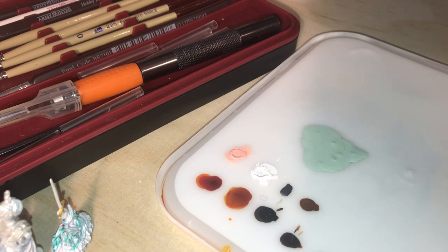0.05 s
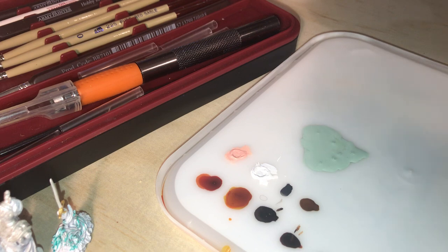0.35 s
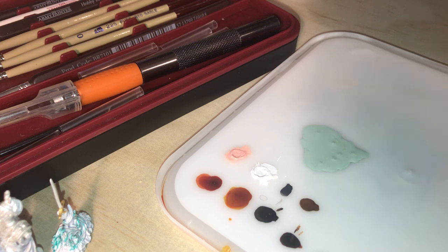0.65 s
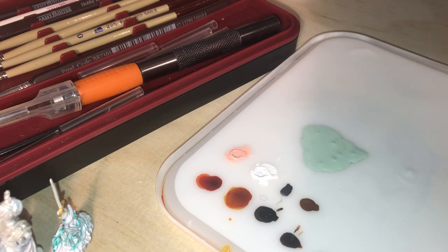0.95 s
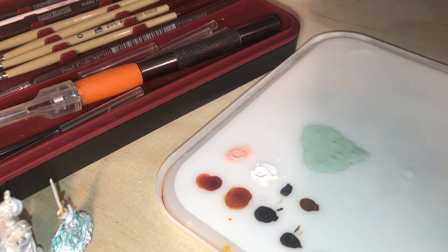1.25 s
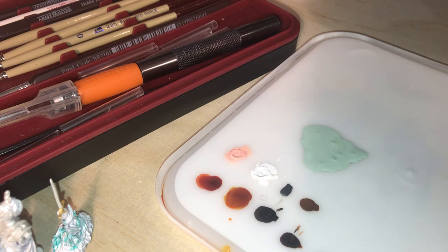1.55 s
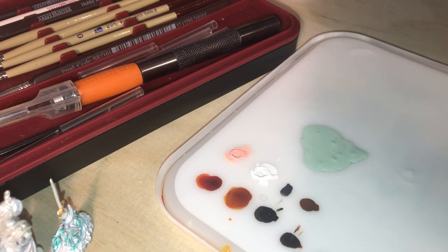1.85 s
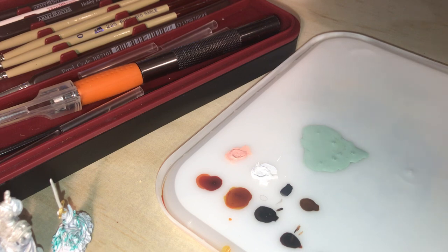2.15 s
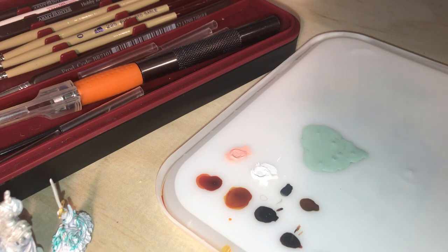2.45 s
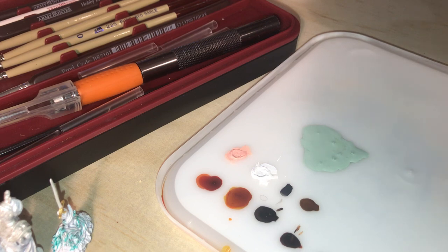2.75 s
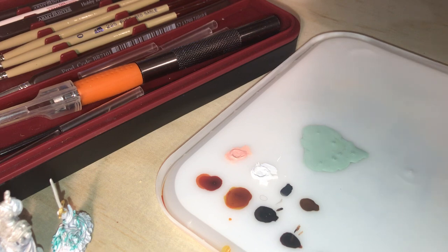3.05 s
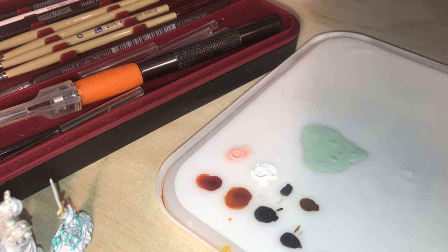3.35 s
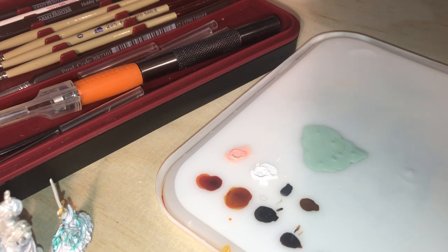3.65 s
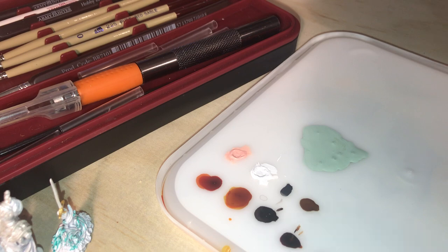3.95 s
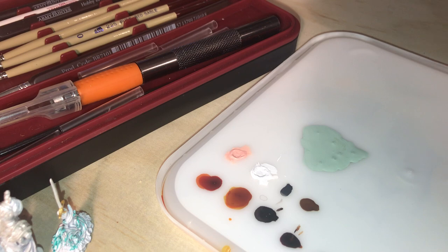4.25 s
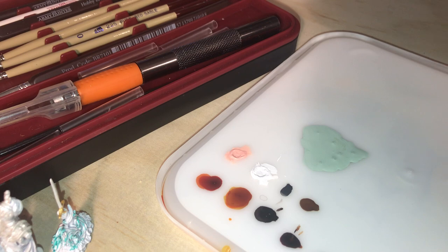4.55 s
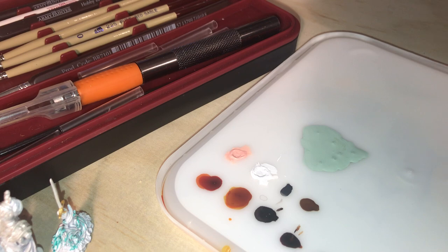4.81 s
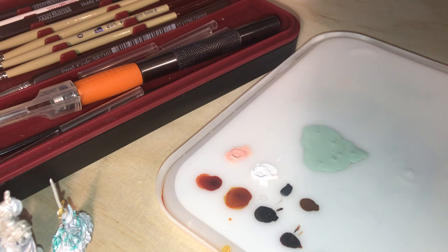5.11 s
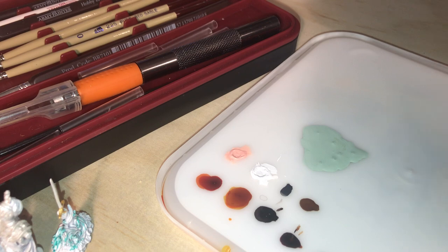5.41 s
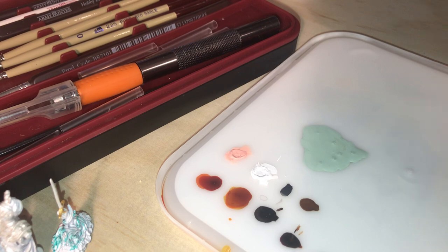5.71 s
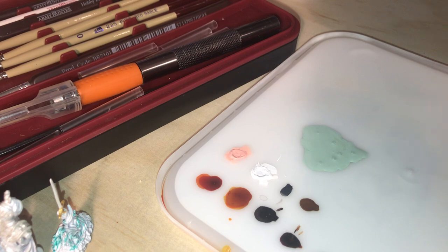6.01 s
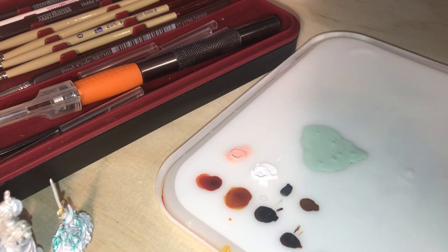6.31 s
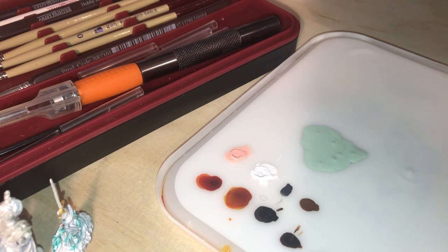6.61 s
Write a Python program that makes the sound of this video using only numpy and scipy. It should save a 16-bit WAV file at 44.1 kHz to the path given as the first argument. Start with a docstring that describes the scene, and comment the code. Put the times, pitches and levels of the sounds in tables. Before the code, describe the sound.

Close up in a quiet, small room, mixing balls rattle in a fast, steady rhythm inside a plastic paint bottle being shaken by hand. Bright clicks alternate with hollow knocks, and thick paint squelches and glugs softly underneath. The shaking hitches just after the start, pauses for a moment near four seconds, then carries on with some harder snaps. Faint room air lies behind it.

```python
"""Mixing balls rattle in a small plastic dropper bottle of paint, shaken about five times a second.
They snap against one end, land with a hollow clack at the other and tap the wall between.
Dragged paint sloshes, small bubbles squelch and air pockets glug; the hand thumps now and then.
A small room answers, over quiet air and a low rumble."""
import sys
import numpy as np
from scipy import signal
from scipy.fft import rfft, irfft
from scipy.io import wavfile

SR = 44100
rng = np.random.default_rng(int(sys.argv[2]) if len(sys.argv) > 2 else 0)


def wav_record(signal):
    """Record a signal, one row per channel, as 16-bit PCM in the file named by sys.argv[1]."""
    frames = np.transpose(np.atleast_2d(signal))
    bounded = np.clip(frames, -1, 1)
    # unit amplitude maps onto the largest positive 16-bit level
    quanta = np.round(bounded * 32767).astype(np.int16)
    wavfile.write(sys.argv[1], SR, quanta)


N = 294147
SIZE = 2048  # samples per short event
AGE_S = np.arange(SIZE) / SR
BINS_HZ = np.maximum(np.fft.rfftfreq(SIZE, 1 / SR), 1)


def clear_strikes():
    """Ball impacts as rows: t/s, click/dB, centre f/Hz, nominal ring/ms, tick/dB, knock/dB."""
    # hard snaps on bare plastic at one end: t/s, click level/dB, tick level/dB
    snaps = [(0.0493, -26, -24.5), (0.0555, -22, -37), (0.2856, -23, -39), (0.3, -25.5, -53),
             (.6704, -21, -32.5), (.892, -18.5, -27), (1.0994, -21.5, -39), (1.2945, -22, -45),
             (1.4943, -28.5, -43), (1.9144, -29, -46), (2.118, -24, -50), (2.522, -25, -42),
             (2.709, -22, -43), (2.9185, -20.5, -40), (3.3299, -25, -42), (4.0747, -26, -25.5),
             (4.1137, -31, -56), (4.293, -26.5, -27.5), (4.3045, -29, -43), (4.492, -29, -48),
             (4.5017, -15.5, -20), (4.705, -18.5, -25), (4.9113, -14.5, -28), (5.1155, -22, -28),
             (5.2836, -25, -35.5), (5.484, -19, -33), (5.6891, -16, -27), (5.8906, -25.5, -38),
             (5.907, -25, -35.5), (6.1396, -23, -36.5), (6.3595, -31.5, -48)]
    # balls landing together at the other end: t/s, click level/dB, knock level/dB
    landings = [(.197, -29.5, -48), (0.5061, -26.5, -42), (0.7513, -30, -43.5), (0.972, -27.5, -44),
                (1.168, -31, -46), (1.367, -33.5, -46), (1.5673, -29, -45.5), (1.766, -27.5, -42.5),
                (1.9723, -28, -41.5), (2.1797, -28.5, -42.5), (2.3867, -26.5, -42), (2.5878, -30, -43),
                (2.788, -33.5, -45), (3.1964, -30, -41), (3.3865, -34, -43.5), (3.813, -36, -45.5),
                (4.0433, -30.5, -53), (4.2211, -30.5, -44.5), (4.4445, -28, -51), (4.6395, -36, -50),
                (5.33, -25.5, -49), (5.4214, -30.5, -49), (5.5547, -26.5, -49), (5.9922, -28, -46.5),
                (6.2105, -33.5, -47.5), (6.4346, -28, -45), (6.6485, -28.5, -45)]
    # side-wall taps in mid-stroke: t/s, click level/dB, tick level/dB, knock level/dB
    taps = [(0.0197, -33, -40, -44), (.2214, -39, -48, -59), (.2445, -38, -43, -56),
            (.2528, -39.5, -46, -60), (0.3213, -38, -47, -74), (0.4715, -44.5, -58, -58),
            (.6044, -35.5, -37.5, -55), (.6278, -38.5, -55, -64), (.683, -32, -46, -63),
            (.706, -38.5, -39, -57), (0.8245, -41.5, -55, -55), (0.8674, -26.5, -39, -47),
            (.9152, -29.5, -40, -49), (1.04, -30.5, -38, -48), (1.0696, -29, -39.5, -46),
            (1.128, -35.5, -45, -49), (1.161, -27, -35, -62), (1.2382, -33.5, -37, -52),
            (1.2611, -33.5, -41, -51.5), (1.321, -37.5, -45, -53), (1.3559, -29, -44, -56),
            (1.433, -31.5, -37.5, -50.5), (1.4568, -32, -43, -55), (1.513, -39, -42.5, -51),
            (1.56, -30, -39.5, -47), (1.641, -33, -42.5, -54), (1.663, -33.5, -44, -60),
            (1.7076, -29.5, -41, -57), (1.7172, -36.5, -41, -48), (1.8383, -33.5, -39.5, -51),
            (1.8692, -36.5, -48, -56), (1.9246, -32, -41, -45.5), (2.0428, -50, -43, -57),
            (2.06, -39, -52, -66), (2.082, -33.5, -43, -48), (2.13, -30, -39, -47.5),
            (2.2676, -36.5, -51, -52), (2.2871, -30, -42, -49), (2.3226, -30, -41, -61),
            (2.339, -39, -43, -53), (2.455, -35.5, -41, -54), (2.487, -28.5, -34, -45),
            (2.543, -34, -39, -51), (2.575, -39, -42, -52), (2.657, -39, -35, -56),
            (2.681, -30, -44, -52.5), (2.731, -35, -42, -53), (2.7799, -28.5, -36.5, -49),
            (2.8584, -33, -33.5, -56), (2.8808, -34, -44, -58), (2.978, -29.5, -44, -50),
            (2.998, -41.5, -51, -45), (3.0618, -36, -40.5, -56), (3.087, -43, -46, -58),
            (3.1307, -38, -49, -68), (3.2674, -29.5, -38.5, -52), (3.289, -34, -42, -48.5),
            (3.3473, -40, -45, -57), (3.467, -34, -45, -50.5), (3.4931, -36, -43, -58),
            (3.5101, -28, -41.5, -42.5), (3.557, -32, -47, -58), (3.5855, -32, -39, -45.5),
            (3.6846, -34, -48, -49.5), (3.726, -31, -38.5, -44), (3.774, -34.5, -46, -48),
            (4.054, -34, -57, -58), (4.1578, -40, -50, -54), (4.2635, -32.5, -37, -49),
            (4.3397, -34.5, -43, -65), (4.3508, -34, -42, -70), (4.4234, -41, -57, -55),
            (4.4762, -32, -34, -49), (4.545, -39, -54, -60), (4.5602, -40, -40, -58),
            (4.649, -35, -53, -49.5), (4.6757, -31.5, -37, -52), (4.753, -36.5, -42, -49),
            (4.8464, -30, -42, -53), (4.875, -33, -39, -49), (4.954, -35, -46, -51), (5.043, -32, -48, -49),
            (5.049, -27.5, -38, -61), (5.069, -33.5, -46, -45), (5.083, -36, -42, -59),
            (5.157, -37.5, -41.5, -48), (5.2297, -37, -34.5, -57), (5.2502, -39, -51, -67),
            (5.452, -37, -46, -51), (5.4982, -38, -50, -58), (5.514, -46, -34, -68),
            (5.6502, -34.5, -44, -58), (5.6671, -27, -41, -60), (5.7671, -27.5, -40, -44),
            (5.8455, -49, -48, -55), (5.944, -35.5, -37, -64), (6.118, -30, -40, -49),
            (6.168, -38.5, -46, -53), (6.3067, -36.5, -47.5, -51), (6.382, -38.5, -54, -62),
            (6.517, -34, -34, -50), (6.5463, -31, -43, -46), (6.586, -34.5, -50, -69),
            (6.6027, -33.5, -41.5, -50.5)]
    rows = []
    for s, db, tick_db in snaps:
        hardness_db = db + 22  # harder: higher and shorter
        hz = 6300 * 2 ** (.012 * hardness_db)
        ring_ms = 1.1 * 2 ** (-max(hardness_db, 0) / 13)
        rows.append((s, db, hz, ring_ms, tick_db, -54))
    for s, db, knock_db in landings:
        rows.append((s, db, 5880, 3.4, db - 8, knock_db))
    for s, db, tick_db, knock_db in taps:
        hz = 5600 * 2 ** (.0545 * (tick_db - db))  # duller: lower
        rows.append((s, db, hz, 2.2, tick_db, knock_db))
    return np.array(rows)


def balls(strikes, click_gain_db=-5.5, tick_gain_db=-1, knock_gain_db=-1, knock_rise_s=.0006):
    """Each strike: a wall click, a bright contact tick and a hollow knock that builds slightly later."""
    # contact tick spectrum: f/Hz, level/dB
    tick_spectrum = [(5000, -39), (8500, 8), (10300, 1), (12000, 2.5), (15500, -2), (17000, -23.5)]
    # hollow bottle modes: nominal f/Hz, level/dB, t60/s
    bottle_modes = [(435, 0, 0.011), (492, -7.5, 0.035), (703, -3, 0.048), (895, -0.5, 0.014),
                    (1106, 2.5, 0.034), (1446, 5.5, 0.016), (1846, 5.5, 0.018)]
    out = np.zeros(N)
    rise = 1 - np.exp(-AGE_S / knock_rise_s)
    for s, click_db, hz, ring_ms, tick_db, knock_db in strikes:
        add(out, s, wall_click(hz, ring_ms), click_db + click_gain_db)
        push = contact(ring_ms * .71, snap=1.7, linger=.27)
        add(out, s, resonate(push, on_log(tick_spectrum, BINS_HZ)), tick_db + tick_gain_db)
        knock = rise * ring(bottle_modes, scale=.97, scatter_db=4)
        add(out, s, knock, knock_db + knock_gain_db)
    return out


def wall_click(hz, ring_ms, focus_db=6.4, tilt_db=2, ripple_db=2.1, ripple_hz=550):
    """The wall rings around hz; each struck spot has its own colour."""
    # plastic wall spectrum: f/Hz, level/dB
    wall_spectrum = [(500, -97), (1200, -11), (1800, 7), (2200, -0.5), (2750, 2.5), (4200, 0), (5500, 0),
                     (7200, 2), (8800, -11.5), (10300, -15), (13000, -30)]
    octaves = np.log2(BINS_HZ / hz)
    spot = np.interp(BINS_HZ / ripple_hz, np.arange(SIZE), rng.standard_normal(SIZE))
    db = on_log(wall_spectrum, BINS_HZ) - focus_db * np.minimum(octaves ** 2, 4)
    db += tilt_db * np.log2(hz / 5600) * octaves + ripple_db * spot
    return resonate(contact(ring_ms * .63, snap=1.45, linger=.3), db)


def contact(energy_decay_ms, snap, linger, linger_s=.0061, bounce=4.2, rebounds=2):
    """A sharp contact, tiny rebounds and the dense, quickly damped vibration of the plastic."""
    decay_s = max(energy_decay_ms, .3) / 1000
    envelope = np.exp(-.5 * AGE_S / decay_s) + linger * np.exp(-AGE_S / linger_s)
    push = rng.standard_normal(SIZE) * envelope
    push[0] = snap * np.sqrt(2 * np.pi)
    for wait, size in rng.random((rebounds, 2)):
        push[1 + int(wait * decay_s * SR)] += bounce * size
    return push


def resonate(push, db):
    """Minimum-phase response to a short push; gain db at BINS_HZ."""
    cepstrum = irfft(np.log(undb(db)))
    cepstrum[1:SIZE // 2] *= 2
    cepstrum[SIZE // 2 + 1:] = 0
    return irfft(rfft(push) * np.exp(rfft(cepstrum)))


def ring(modes, scale, scatter_db):
    """Damped modes, frequencies times scale; where the blow lands sets the weight of each."""
    pitch, db, t60_s = np.transpose(modes)[:, :, None]
    detune, weight, side = rng.standard_normal((3, len(modes), 1))
    hz = pitch * scale * (1 + .025 * detune)
    waves = np.sin(2 * np.pi * hz * AGE_S) * undb(-60 * AGE_S / t60_s)
    return np.sum(np.sign(side) * undb(db + scatter_db * weight) * waves, axis=0)


def grazes(strikes, soonest_s=.005, spread_s=.016, scatter_db=2, centre_hz=4800, ring_ms=2.4):
    """Extra strike rows: other balls often touch down softly just before or after a clear strike."""
    rows = []
    for side, chance, level_db in (-1, .15, -47), (.99, .55, -43):  # before, after
        draws = rng.random((len(strikes), 2))
        sizes = rng.standard_normal(len(strikes))
        for (s, *_), (luck, wait), size in zip(strikes, draws, sizes):
            s += side * (soonest_s + spread_s * wait)
            db = level_db + scatter_db * size
            if luck < chance and s > 0:
                rows.append((s, db, centre_hz, ring_ms, db - 9, db - 17))
    return np.reshape(rows, (-1, strikes.shape[1]))


def chatter(strikes, soonest_s=.0028, spread_s=.032, centre_hz=4200, gain_db=-25, spread_db=6):
    """After a strike the ball grazes the wall again, cushioned by paint."""
    out = np.zeros(N)
    for (s, click_db, *_), (wait, size, pitch) in zip(strikes, rng.random((len(strikes), 3))):
        db = np.clip(click_db, -42, -33) + gain_db + spread_db * size
        click = wall_click(centre_hz * 2 ** (pitch - .5), ring_ms=2.2)
        add(out, s + soonest_s + spread_s * wait, click, db)
    return out


def jostle(slots=200, level_db=-58.5, scatter_db=3.5, centre_hz=4200, ring_ms=1.8):
    """While the bottle moves, the balls jostle in the paint with faint, scattered ticks."""
    # spells of shaking: start t/s, end t/s
    shaking = [(0, .36), (.45, 3.84), (4.04, 6.67)]
    out = np.zeros(N)
    draws = np.c_[rng.random((slots, 2)), rng.standard_normal(slots)]
    for slot, (wait, pitch, size) in enumerate(draws):
        s = (slot + wait) / slots * N / SR
        if any(start < s < end for start, end in shaking):
            click = wall_click(centre_hz * 2 ** (pitch - .5), ring_ms)
            add(out, s, click, level_db + scatter_db * size)
    return out


def slosh(strikes, gain_db=-13, cap_db=-35, drag_s=.0077, rough_db=9.5, rough_hz=350):
    """Each ball drags paint along the wall: a soft, rough wash just after the strike."""
    # paint wash spectrum: f/Hz, level/dB
    wash_spectrum = [(400, -20), (1100, -4), (1900, -1), (3000, -2.5), (5000, -5.5), (9000, -12.5),
                     (16000, -19)]
    drive = np.zeros(N)
    for s, click_db, *_ in strikes:
        add(drive, s, AGE_S * np.exp(-AGE_S / drag_s), min(click_db, cap_db) + gain_db)
    wash = colour(rng.standard_normal(N), wash_spectrum) * undb(rough_db * wander(rough_hz))
    return drive * wash / wash.std()


def squelches(count=4, cluster_s=.00764, rise_cycles=.96, t60_cycles=18):
    """Clusters of like-sized bubbles burst; each swells and rings briefly in the thick paint."""
    # bubble clusters: t/s, level/dB, f/Hz
    clusters = [(.022, -42.5, 1900), (.605, -42, 2190), (.864, -43.5, 847), (2.488, -45, 890),
                (3.263, -43, 1950), (3.511, -43, 970), (3.6, -51, 1030), (4.263, -43.5, 1870),
                (4.292, -42, 1500), (4.873, -41.5, 1950), (5.891, -45.5, 945)]
    out = np.zeros(N)
    for s, db, hz in clusters:
        for wait, pitch in rng.random((count, 2)):
            cycles = AGE_S * hz * (1 + .3 * (pitch - .5))
            envelope = (1 - np.exp(-cycles / rise_cycles)) * undb(-60 * cycles / t60_cycles)
            bubble = np.sin(2 * np.pi * cycles) * envelope
            add(out, s + cluster_s * wait, bubble, db - 10 * np.log10(count))
    return out


def glugs(base_hz=506, start_ratio=3.64, end_ratio=.776, fall_s=.00359, rise_s=.0022, fade_s=.01,
          gurgle=1.3, scatter_db=4):
    """An air pocket opens with a falling chirp that sweeps the resonances of the bottle's air."""
    # air pockets shifting in the paint: t/s, level/dB
    pockets = [(.105, -50), (.153, -41), (2.328, -48), (2.529, -49.5), (3.144, -54), (3.338, -45.5),
               (4.124, -51), (4.571, -49), (4.757, -49), (4.966, -47), (5.166, -41), (5.361, -45),
               (5.396, -47.5), (5.626, -44), (5.852, -48)]
    # air resonances: f/glug pitch, level/dB, bandwidth/glug pitch
    air_modes = [(1, 0.5, .14), (2.05, 2, .22), (3.25, 7, .3)]
    ratio, mode_db, width = np.transpose(air_modes)[:, :, None]
    envelope = (1 - np.exp(-AGE_S / rise_s)) * np.exp(-(AGE_S / fade_s) ** 2)
    out = np.zeros(N)
    for s, db in pockets:
        hz = base_hz * (1 + .022 * rng.standard_normal())
        sweep_hz = hz * (end_ratio + (start_ratio - end_ratio) * np.exp(-AGE_S / fall_s))
        flow = np.sin(2 * np.pi * np.cumsum(sweep_hz) / SR) + gurgle * rng.standard_normal(SIZE)
        gain = undb(mode_db + scatter_db * rng.standard_normal((len(air_modes), 1)))
        cavity = np.sum(gain / (1 + 2j * (BINS_HZ / hz - ratio) / width), axis=0)
        add(out, s, irfft(rfft(flow * envelope) * cavity), db)
    return out


def hand(rise_s=.0015):
    """The shaking hand thumps softly now and then."""
    # hand thumps: t/s, level/dB, f/Hz
    thumps = [(1.52, -53, 192), (4.701, -62, 200), (5.14, -60, 274)]
    modes = [(1, 2, .047), (.76, 2, .026)]  # f/thump pitch, level/dB, t60/s
    rise = 1 - np.exp(-AGE_S / rise_s)
    out = np.zeros(N)
    for s, db, hz in thumps:
        add(out, s, rise * ring(modes, scale=hz, scatter_db=1), db)
    return out


def room(dry, gain_db=-12, build_s=.0024, echo_s=.0125, echo_width_s=.00051, echo_boost=.54):
    """Scattered reflections, with an early cluster off the nearest wall; bass and top die first."""
    # reflection spectrum: f/Hz, level/dB
    reflection_spectrum = [(150, 14.5), (500, 8.5), (1500, 2.5), (3500, -1), (7000, -4.5), (10500, 1),
                           (16000, 7.5)]
    # room decay: f/Hz, t60/s
    decay = [(300, 0.15), (2500, 0.5), (7000, 0.44), (15000, 0.17)]
    band_hz, band_t60_s = np.transpose(decay)
    t = np.arange(SR // 2) / SR
    hz = np.fft.rfftfreq(len(t), 1 / SR)
    scatter = rfft(colour(rng.standard_normal(len(t)), reflection_spectrum))
    tail = np.zeros(len(t))
    for share, t60_s in zip(np.eye(len(decay)), band_t60_s):
        band = on_log(np.c_[band_hz, share], hz)
        tail += irfft(scatter * band, len(t)) * undb(-60 * t / t60_s)
    tail *= 1 - np.exp(-t / build_s)
    tail *= 1 + echo_boost * np.exp(-((t - echo_s) / echo_width_s) ** 2)
    return undb(gain_db) * signal.fftconvolve(dry, tail / np.linalg.norm(tail))[:N]


def background(air_db=-61, floor_db=-71, rumble_hz=80.3, waver_hz=7, swell_s=.043):
    """Quiet room air and a low, wavering rumble that comes and goes."""
    # room air spectrum: f/Hz, level/dB
    air_spectrum = [(20, -18), (45, -1.5), (75, 2.5), (110, -2), (150, -5.5), (300, -11.5), (600, -14.5),
                    (1500, -15), (4000, -20.5), (10000, -24.5), (16000, -24.5)]
    # rumble swells: t/s, level/dB
    swells = [(.53, -61), (1.95, -58), (2.115, -63), (3.98, -55.5), (5.168, -55.5), (5.422, -54)]
    t = np.arange(N) / SR
    air = colour(rng.standard_normal(N), air_spectrum)
    hz = rumble_hz + waver_hz * wander(rate_hz=12)
    envelope = undb(floor_db) + sum(undb(db) * np.exp(-((t - s) / swell_s) ** 2) for s, db in swells)
    rumble = envelope * np.sin(2 * np.pi * np.cumsum(hz) / SR)
    return undb(air_db) * air / air.std() + rumble


def undb(db):
    """Decibels to gain."""
    return 10 ** (np.asarray(db) / 20)


def on_log(points, hz):
    """Interpolate (f/Hz, value) points over log frequency."""
    f, value = np.transpose(points)
    return np.interp(np.log(np.maximum(hz, 1)), np.log(f), value)


def colour(x, points):
    """Filter x by (f/Hz, gain/dB) points."""
    hz = np.fft.rfftfreq(len(x), 1 / SR)
    return irfft(rfft(x) * undb(on_log(points, hz)), len(x))


def wander(rate_hz):
    """Random values at rate_hz, joined by straight lines."""
    return np.interp(np.arange(N) * rate_hz / SR, np.arange(N), rng.standard_normal(N))


def add(out, s, sound, db):
    """Mix in a short sound at time s, with the energy of 10 ms at db."""
    start = int(np.clip(s * SR, 0, N - 1))
    gain = undb(db) * np.sqrt(SR / 100 / np.sum(sound ** 2))
    out[start:start + SIZE] += gain * sound[:N - start]


def scene():
    """The bottle close by, its room and the background; mono."""
    clear = clear_strikes()
    strikes = np.vstack([clear, grazes(clear)])
    bottle = balls(strikes) + chatter(strikes) + slosh(strikes) + jostle()
    bottle += squelches() + glugs() + hand()
    return (bottle + room(bottle) + background())[None]


def record(dry):
    """Steep low-pass at 15.9 kHz."""
    return signal.sosfilt(signal.ellip(10, .2, 70, 15900, fs=SR, output="sos"), dry)


dry = scene()
out = record(dry)
wav_record(out)
```